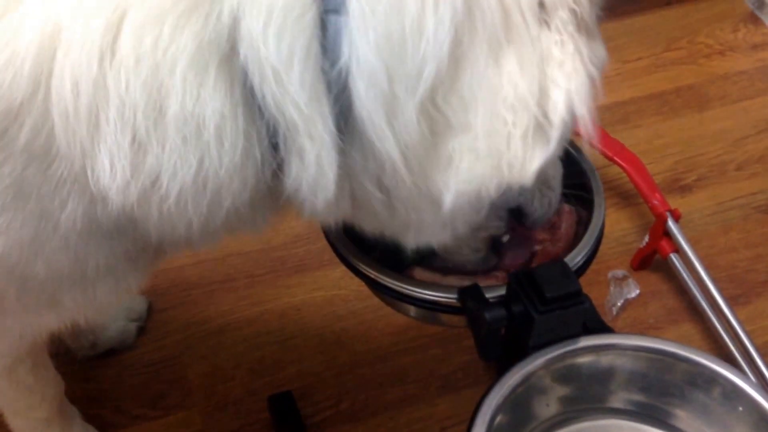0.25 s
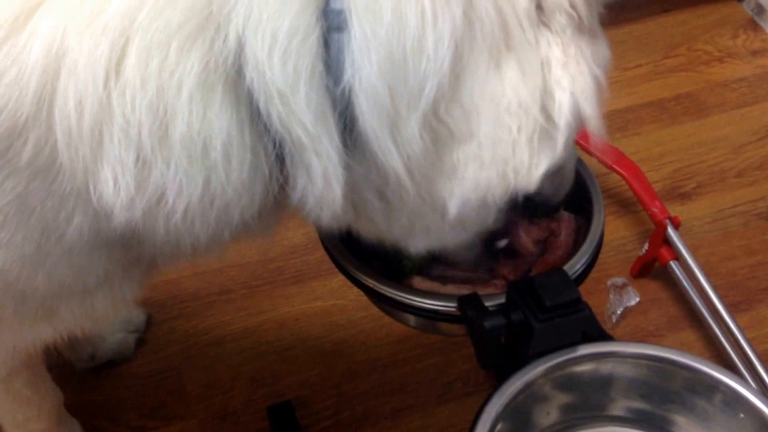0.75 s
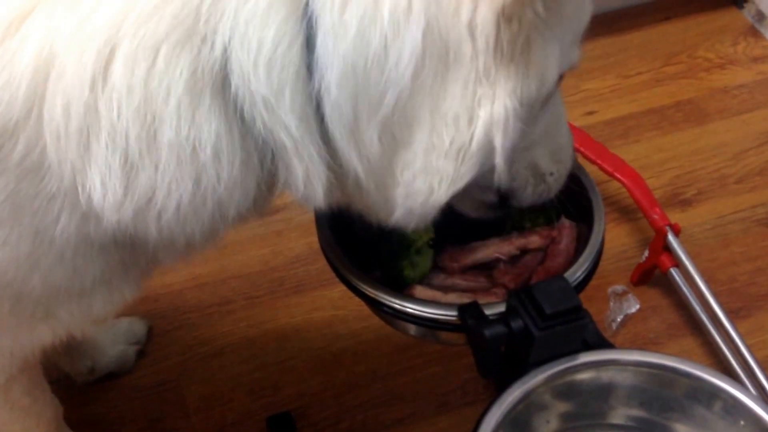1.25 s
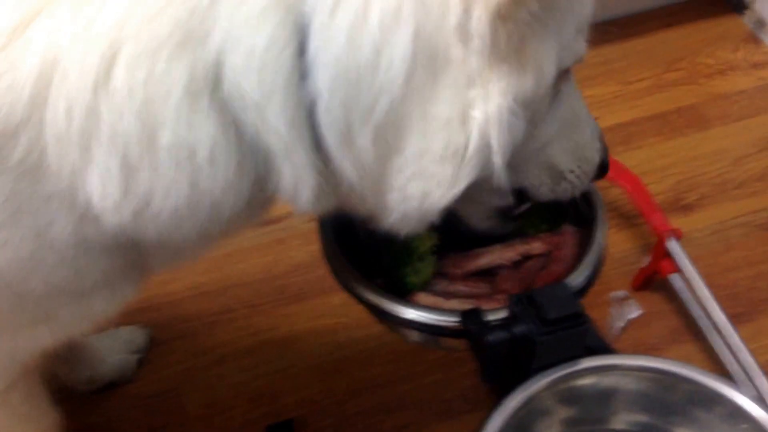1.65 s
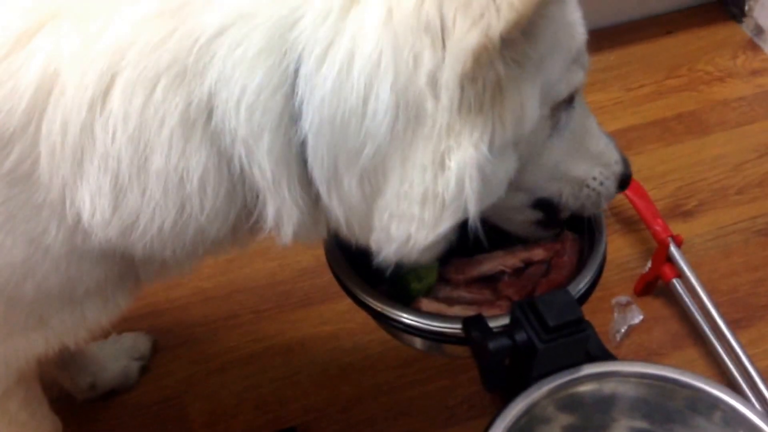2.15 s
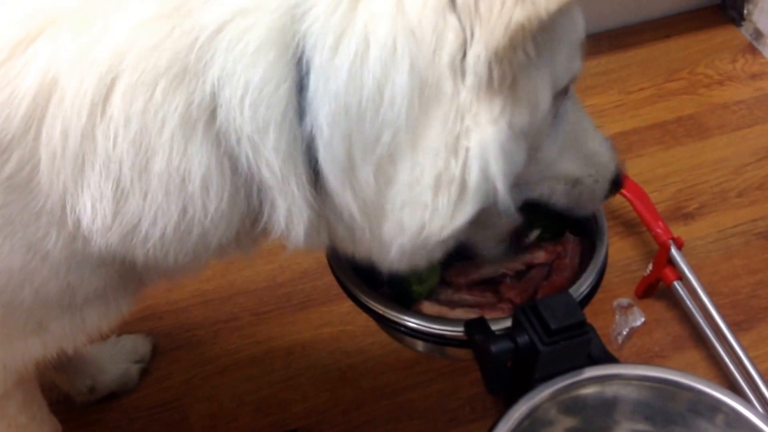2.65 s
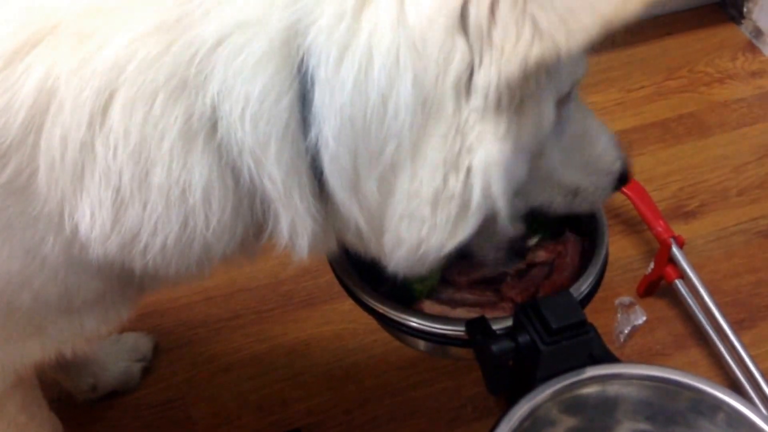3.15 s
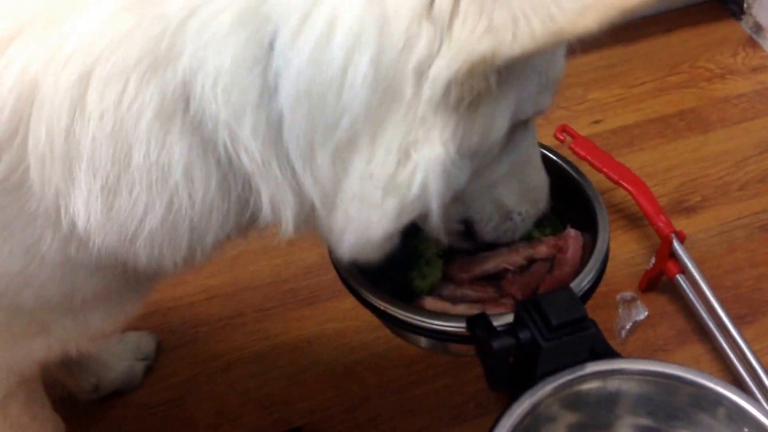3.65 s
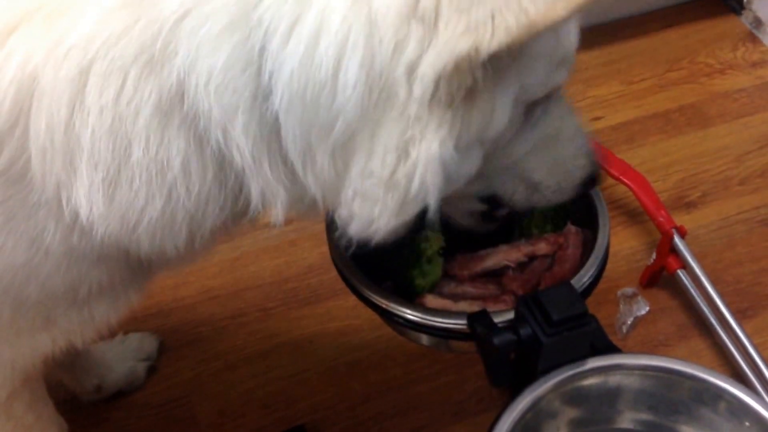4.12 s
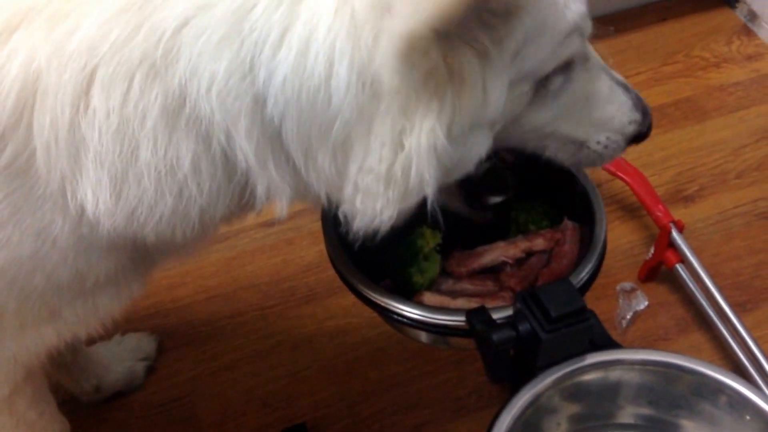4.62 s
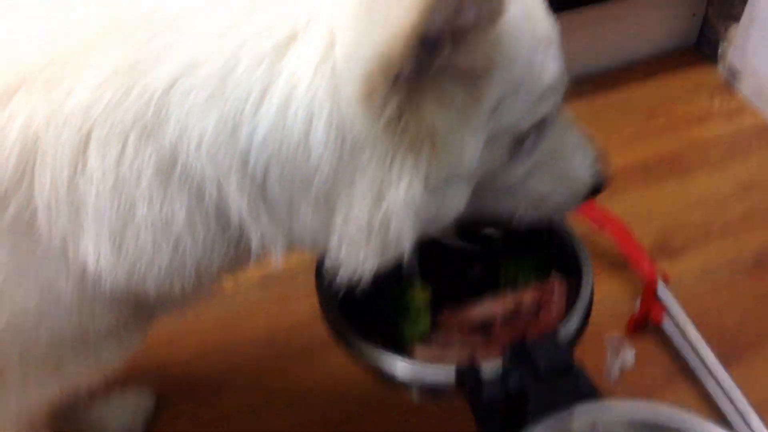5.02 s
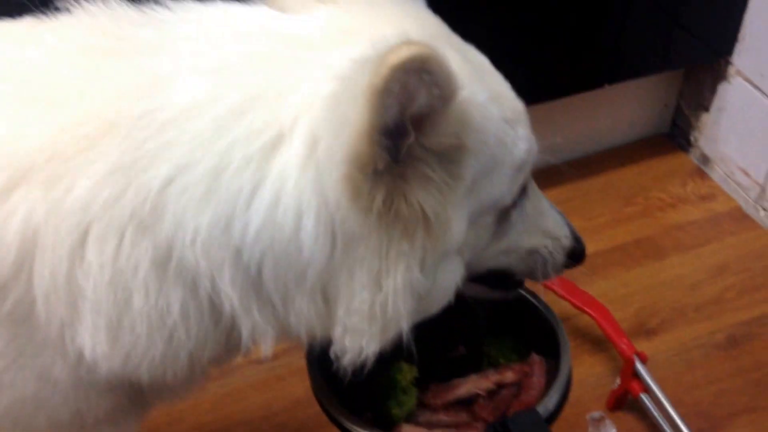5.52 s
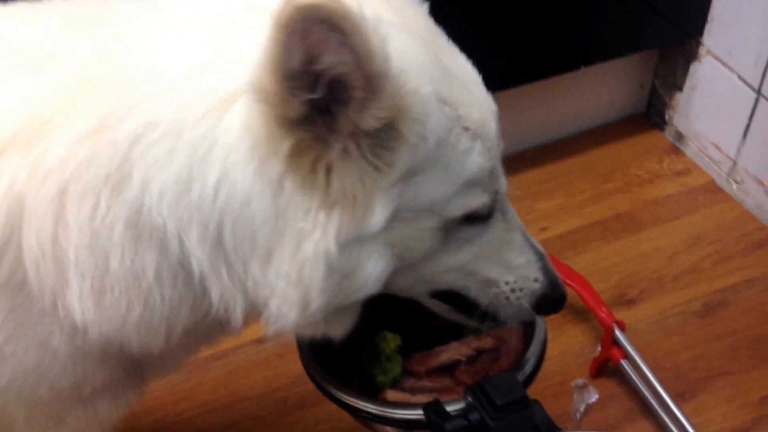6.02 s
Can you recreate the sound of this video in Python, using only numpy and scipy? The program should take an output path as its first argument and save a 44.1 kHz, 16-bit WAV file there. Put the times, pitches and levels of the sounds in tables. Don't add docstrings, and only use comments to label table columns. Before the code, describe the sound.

A dog chews raw food over a steel bowl, close to a small camera microphone in a short, bright kitchen with a faint flutter echo and steady soft hiss. From 0 to 1.8 s it is sparse: wet snaps, dull muffled clacks and hollow mouth pops around 0.4, 0.8 and 1.2. At about 2.1 a sharp clink and sudden crunch, with a low knock in the boards. A pause with small wet snaps, then at 2.9-3.1 a rapid cluster of clinks, pops, bright fizzing snaps and grinding. From 3.3 to 4.4 only faint mumbling tongue pops, light ticks and low grinding. At 4.45 the loudest bite: a deep hollow pop, hard crack and dull clack, followed by floor knocks until 4.9. Quiet mouthing follows, then busy clinks and crunching at 5.5-5.7, and a last burst at 6.05-6.15 with steady grinding to the end at about 6.3.

```python
import sys
import numpy as np
from scipy import signal
from scipy.fft import rfft, irfft
from scipy.io import wavfile
from scipy.ndimage import uniform_filter1d

SR = 44100
rng = np.random.default_rng(int(sys.argv[2]) if len(sys.argv) > 2 else 0)


def gain_from_db(level_db):
    decades = np.asarray(level_db, float) / 20
    return 10 ** decades


def output_pcm(signal):
    pcm = np.clip(np.atleast_2d(signal).T, -1, 1) * 32767
    wavfile.write(sys.argv[1], SR, np.round(pcm).astype(np.int16))


N = 276948

# frequency_hz, density_db
HISS_SPECTRUM = [(24, -40), (38, 6.5), (61, -3), (182, 4.5), (430, -2.5), (717, -5.5), (889, -5),
                 (1330, -12), (1740, -8), (2100, -8), (4330, -6.5), (14100, -10.5), (15300, -11)]
# start_s, peak_db, pitch_hz
THUMPS = [(0.129, -56, 69.6), (0.168, -61.5, 74), (0.889, -61, 62), (3.377, -67, 98), (4.654, -51.5, 72),
          (4.697, -52, 68), (4.789, -55, 67.32), (4.892, -59.5, 71.5), (5.876, -58, 71), (6.079, -54, 38),
          (6.137, -57, 67), (6.218, -63, 63.4)]
# start_s, peak_db, pitch_hz
KNOCKS = [(0.13, -59, 167), (0.243, -53.5, 318), (0.266, -62, 184), (1.829, -61, 340), (2.096, -50.5, 219),
          (2.163, -47.5, 177.5), (2.92, -54.5, 208), (2.948, -49, 337), (3.004, -50.5, 223),
          (3.368, -59.5, 158), (4.45, -42.5, 163), (4.657, -45.5, 342), (4.673, -42, 228.6),
          (4.719, -43.5, 209), (4.802, -54, 234.4), (4.858, -56.5, 229.4), (5.55, -62, 230),
          (5.62, -55, 194.6), (6.041, -58, 224), (6.118, -63, 157), (6.165, -51.5, 216),
          (6.224, -54.5, 241)]
BOARD_MODES = [130.5, 172.3, 218.3, 274.4, 340, 398.7]
# start_s, level_db
GRIND_SPELLS = [
    [(1.88, -94), (2.112, -40.5), (2.3, -58)],
    [(2.7, -58.5), (2.972, -47.5), (3.2, -88)],
    [(3.3, -64), (3.722, -59.5), (4.44, -56)],
    [(4.46, -33.5), (4.616, -54.5), (4.9, -58)],
    [(5.3, -63.5), (5.634, -42.5), (5.8, -73)],
    [(5.93, -52.5), (6.06, -52), (6.28, -48.5)],
]
# frequency_hz, density_db
CRUNCH_SPECTRUM = [(180, -46), (300, -17), (681, -7), (925, 2.5), (1300, -3.5), (1760, 0), (2170, -0.5),
                   (4260, -5), (14000, -18)]
# start_s, peak_db, centre_hz
SNAPS = [(0.163, -39, 5270), (0.451, -44, 6500), (0.706, -45, 5700), (0.998, -48, 8080), (1.899, -47, 6330),
         (2.0988, -38, 6460), (2.211, -36, 4870), (2.455, -36.5, 5400), (2.9446, -45, 6200),
         (2.9536, -28, 6100), (3.011, -36, 5900), (3.1054, -31, 5200), (3.3368, -46, 6946),
         (3.5492, -43.5, 5650), (4.409, -45.5, 5560), (4.447, -32, 4000), (4.45, -22.5, 5000),
         (5.1, -41, 6500), (5.5483, -39, 5910), (5.606, -54, 4900), (5.7037, -36.5, 5430),
         (5.9434, -52, 5120), (6.0484, -35, 6200), (6.093, -48, 5050), (6.1273, -34, 5100)]
# start_s, peak_db, centre_hz
FIZZES = [(0.4503, -38.5, 12900), (0.8629, -46, 11300), (1.8397, -36.5, 12900), (2.169, -37, 8600),
          (2.7934, -38.5, 10600), (2.9163, -41, 9300), (2.9412, -26, 9300), (3.1047, -24, 14100),
          (3.109, -49, 10700), (5.2654, -43, 8100), (5.348, -43, 9400), (5.6565, -39, 9500),
          (6.0492, -43, 12000), (6.1265, -39.5, 9100)]
# pitch_hz, width_hz, level_db
BOWL_MODES = [(1766, 8.1, -2), (2320, 13, -10), (2710, 46, -10), (3260, 27, -3), (4160, 160, -8.5),
              (5714, 130, -14), (7260, 100, -16.5), (4830, 84, -26), (7940, 46, -39), (8360, 35, -33)]
# start_s, peak_db, lower_ring_hz, upper_ring_hz
CLINKS = [(0.161, -42.5, 1480, 2940), (1.8995, -45.5, 2150, 3160), (1.9284, -39, 1800, 2630),
          (2.0997, -27.5, 1860, 3870), (2.172, -40.5, 1880, 2550), (2.455, -44, 1870, 4300),
          (2.9173, -33, 1880, 2570), (2.9447, -36.5, 1480, 3400), (2.9511, -25.5, 1840, 2960),
          (2.979, -60, 1670, 3170), (3.9265, -46, 1980, 2380), (4.298, -50.5, 1920, 3260),
          (4.6862, -56, 1420, 2854), (4.696, -53, 1570, 4240), (4.8158, -55, 1800, 2540),
          (5.016, -52.5, 1320, 2980), (5.1863, -54.5, 1720, 2570), (5.2082, -51.5, 2040, 5860),
          (5.4373, -45.5, 2160, 3460), (5.4943, -53.5, 1840, 2710), (5.5476, -40, 1780, 2460),
          (5.562, -36, 1760, 4040), (5.6241, -35.5, 1940, 4200), (5.6644, -45.5, 1340, 2450),
          (5.701, -51, 1530, 3130), (5.7174, -41, 1680, 4160), (5.8707, -57.5, 2170, 4470),
          (6.0468, -33.5, 1520, 3870), (6.2244, -49, 1440, 3300)]
# start_s, peak_db, ring_hz, contact_ms
CLACKS = [(0.187, -54, 1290, 70), (0.4515, -55.5, 2120, 4.9), (0.705, -54, 2130, 10),
          (1.1706, -54.5, 2040, 7.4), (1.341, -62.5, 1760, 12), (1.363, -53.5, 2030, 12),
          (1.416, -58, 1900, 10), (2.485, -50, 1730, 4.08), (2.7525, -52.5, 1340, 16.1),
          (2.967, -31, 1880, 5), (3.0114, -35, 1800, 6.4), (3.032, -41, 1690, 8.7),
          (3.5862, -58.5, 1560, 16.2), (3.8974, -52, 1730, 7), (4.0974, -60.5, 1700, 23),
          (4.453, -26.5, 1920, 14.4), (4.537, -34.5, 1800, 4.4), (4.788, -56, 2170, 5.1),
          (4.8312, -56.5, 1800, 8.4), (5.084, -46.5, 1300, 20), (6.13, -35.5, 1550, 14)]
# start_s, peak_db, ring_hz
TICKS = [(0.133, -60, 1890), (0.998, -56, 2840), (1.275, -56, 3720), (2.082, -59, 2950),
         (3.3347, -54, 4520), (3.6737, -46.5, 3610), (3.9303, -45.5, 2360), (4.212, -51, 3320),
         (4.2858, -53, 4260), (5.3483, -56, 3050), (5.3584, -50.5, 3750), (5.393, -50.5, 2620),
         (5.597, -44, 4150), (5.9, -53, 3720), (5.94, -48, 3460), (6.15, -51, 2710), (6.1677, -59, 2630),
         (4.4544, -39, 2750), (4.553, -59, 2700), (2.115, -56, 4200), (6.094, -50, 4000),
         (6.113, -54, 4050)]
# start_s, peak_db, ring_hz, contact_ms
PRICKS = [(2.955, -29, 2050, 1.6), (3.1078, -37.5, 2580, 8.3), (5.6101, -34.5, 3800, 5.6),
          (5.6251, -37.5, 4700, 3), (5.7046, -45, 4970, 3), (2.178, -52, 2600, 3.4), (2.215, -51, 2900, 4),
          (3.034, -40, 2650, 3.8), (2.9445, -37, 3000, 1.6), (5.718, -47, 2470, 1.1),
          (6.1285, -38.5, 4760, 2.5), (4.769, -56, 1900, 6)]
# start_s, peak_db, cavity_hz, length_ms
POPS = [(0.365, -50, 894, 10), (0.374, -41.5, 890, 5.1), (0.78, -38, 853, 6.6), (1.171, -41.5, 930, 4),
        (1.447, -44, 935, 6.9), (1.95, -51.5, 980, 6.3), (2.099, -44, 1245, 11), (2.171, -36, 996, 4),
        (2.9065, -39.5, 945, 4.9), (2.918, -34.5, 1180, 7.3), (2.9525, -28.5, 1170, 3),
        (2.9675, -33, 1090, 3.1), (3.008, -36.5, 1010, 6.3), (3.604, -52, 1090, 7.6),
        (4.382, -48.5, 1080, 5), (4.4535, -18.5, 898, 7.1), (4.857, -45, 915, 1.6),
        (5.016, -49.5, 840, 4.4), (5.086, -55, 1550, 4), (5.55, -54, 1270, 9.8), (5.561, -43.5, 1310, 9.3),
        (5.636, -46.5, 1260, 8.3), (6.045, -46.5, 890, 9.5), (6.13, -42, 1140, 3.7), (6.259, -50, 840, 6.8)]
# start_s, peak_db, cavity_hz
MUMBLES = [(0.707, -58, 880), (1.186, -58.5, 677), (1.25, -63, 645), (1.462, -60.5, 675),
           (1.355, -58.5, 790), (1.844, -61, 660), (2.071, -57, 910), (2.181, -45, 884), (2.486, -62, 985),
           (3.476, -58.5, 930), (3.586, -60, 910), (3.661, -57, 886), (3.782, -59, 830),
           (3.922, -59.5, 873), (4.088, -61, 886), (4.214, -60, 990), (4.348, -56, 1290), (4.806, -62, 890),
           (4.824, -54, 928), (5.151, -62, 1025), (5.286, -60, 858), (5.496, -58.5, 1270),
           (5.822, -58.5, 840), (5.958, -57, 820), (5.999, -56.5, 775), (6.227, -56, 840),
           (4.393, -57, 1340), (4.412, -54, 910), (4.427, -56, 910), (4.441, -54, 880), (4.597, -63, 890),
           (4.64, -60, 847), (5.094, -59, 1215), (2.782, -60, 1280), (5.605, -48, 1600), (6.069, -57, 1490),
           (6.095, -50, 1510), (4.684, -55, 2850), (4.828, -53.5, 1800), (4.868, -60.5, 1250),
           (4.9, -60, 1010), (4.92, -62, 1170), (4.768, -62, 1800), (2.083, -56, 930), (4.991, -59, 920)]
# frequency_hz, t60_s
KITCHEN_DECAY = [(300, 0.93), (900, 0.24), (2000, 0.34), (5000, 0.29), (10000, 0.25), (15000, 0.083)]

HISS_DB = -64
THUMP_T60_S, KNOCK_T60_S = 0.2, 0.22
SNAP_OCTAVES, SNAP_MS = 0.49, 10
FIZZ_OCTAVES, FIZZ_MS = 0.77, 13.5
STRIKE = 8.4
CLINK_UPPER_DB, CLINK_MS = -3.5, 13.6
CLACK_UPPER_DB, CLACK_RATIO = -32, 1.6
TICK_UPPER_DB, TICK_LOW_HZ, TICK_MS = 4.5, 1800, 15
MUMBLE_MS = 11.7
HALL_DB, HALL_T60_S = -14.5, 0.7
FLUTTER_S, SCATTER_S, FLUTTER_DB, BOUNCE_DB = 0.0245, 0.0015, -22.5, -4.0
EDGE_HZ, LOW_CUT_HZ = 15360, 36


def evened(x):
    return x / np.sqrt(np.mean(x ** 2) + 1e-20)


def read(points, hz):
    f, value = np.transpose(points)
    return np.interp(np.log(hz + 1), np.log(f + 1), value)


def follow(tables):
    t = np.arange(N) / SR
    gain = np.zeros(N)
    for rows in map(np.array, tables):
        gain += gain_from_db(np.interp(t, rows[:, 0], rows[:, 1], -150, -150))
    return uniform_filter1d(gain, 200)


def add(mix, s, db, sound):
    part = mix[..., round(s * SR):][..., :sound.shape[-1]]
    peak = abs(np.atleast_2d(sound)[0]).max()
    part += gain_from_db(db) * sound[..., :part.shape[-1]] / peak


def resonate(x, hz, width):
    r = np.exp(-np.pi * width / SR)
    poles = [2, -4 * r * np.cos(2 * np.pi * hz / SR), 2 * r * r]
    return signal.lfilter([1 - r * r, 0, r * r - 1], poles, x)


def contact(ms, rise):
    u = np.arange(2048) / SR / (ms / 1000)
    release = np.exp(-0.8 * u - u ** 3) + 0.15 * np.exp(-u)
    return (1 - np.exp(-u / rise)) ** 2 * release


def hiss():
    frames, hz = N // 256 + 5, np.fft.rfftfreq(1024, 1 / SR)
    a, b, patches = rng.standard_normal((frames, 513, 3)).T
    patches = evened(uniform_filter1d(uniform_filter1d(patches, 5, 0), 10, 1))
    lumps_db = 0.9 + 2.2 / (1 + (hz / 1200) ** 2)
    level_db = read(HISS_SPECTRUM, hz)[:, None] + lumps_db[:, None] * patches
    noise = signal.istft((a + 1j * b) * gain_from_db(level_db), nperseg=1024, noverlap=768)[1][:N]
    return gain_from_db(HISS_DB + 1.5) * evened(noise)


def boards():
    out, t = np.zeros(N), np.arange(SR // 2) / SR
    rows = [(*row, THUMP_T60_S, 0) for row in THUMPS]
    rows += [(*row, KNOCK_T60_S, 0.47) for row in KNOCKS]
    for (s, db, hz, t60, neighbours), chance in zip(rows, rng.random((len(rows), 13))):
        tone = np.sin(2 * np.pi * (hz * t + chance[0]))
        for f, phase, luck in zip(BOARD_MODES, chance[1:7], chance[7:]):
            mode_hz = f * (0.85 + 0.182 * luck)
            mode = np.sin(2 * np.pi * (mode_hz * t + phase))
            tone += neighbours * gain_from_db(-0.12 * f * t) * mode
        push = (1 - np.exp(-t * hz)) ** 2
        add(out, s - 0.004, db, tone * push * gain_from_db(-60 * t / t60))
    return out


def grind():
    out, hz = np.zeros(N), np.fft.rfftfreq(N, 1 / SR)
    for f in np.geomspace(700, 9000, num=12):
        size = gain_from_db(3.0 * np.minimum(rng.exponential(1, N), 4)) * rng.choice([-1, 1], N)
        cracks = size * (rng.random(N) < 160 / SR)
        out += evened(resonate(cracks, f, 0.18 * f)) * np.sqrt(f)
    coloured = irfft(rfft(out) * gain_from_db(read(CRUNCH_SPECTRUM, hz)), N)
    return follow(GRIND_SPELLS) * gain_from_db(-14) * evened(coloured)


def snaps():
    out, hz = np.zeros(N), np.fft.rfftfreq(2048, 1 / SR) + 1
    rows = [(*row, SNAP_OCTAVES, SNAP_MS) for row in SNAPS]
    rows += [(*row, FIZZ_OCTAVES, FIZZ_MS) for row in FIZZES]
    for (s, db, centre_hz, octaves, ms), g in zip(rows, rng.standard_normal((len(rows), 2048))):
        colour = gain_from_db(-6 * (np.log2(hz / centre_hz) / octaves) ** 2)
        crackle = irfft(rfft(g * abs(g)) * colour)
        add(out, s - 0.001, db - 4.5, crackle * contact(ms, 0.15))
    return out


def clinks():
    out = np.zeros((4, N))
    hits = [(*row, CLINK_UPPER_DB, CLINK_MS) for row in CLINKS]
    hits += [(s, db, hz, CLACK_RATIO * hz, CLACK_UPPER_DB, ms) for s, db, hz, ms in CLACKS]
    hits += [(s, db, TICK_LOW_HZ, hz, TICK_UPPER_DB, TICK_MS) for s, db, hz in TICKS]
    hits += [(s, db, TICK_LOW_HZ, hz, TICK_UPPER_DB, ms) for s, db, hz, ms in PRICKS]
    grit = rng.standard_normal((len(hits), 3, 2048))
    luck = rng.standard_normal((len(hits), len(BOWL_MODES)))
    for (s, db, low_hz, high_hz, high_db, ms), g, chance in zip(hits, grit, luck):
        force = g * np.sqrt(abs(g)) * contact(ms, 0.06)
        force[:, 30] += STRIKE
        upper = min(gain_from_db(2 * high_db), 0.97)
        low = evened(resonate(resonate(force, low_hz, 200), low_hz, 1950)) * np.sqrt(1 - upper)
        high = evened(resonate(resonate(force, high_hz, 330), high_hz, 1015)) * np.sqrt(upper)
        centre_hz = low_hz * (high_hz / low_hz) ** upper
        near = np.zeros_like(force)
        for (f, width, level_db), c in zip(BOWL_MODES, chance):
            mode_db = level_db + 2.0 * c - 1.2 * np.log2(f / centre_hz) ** 2
            near += gain_from_db(mode_db) * resonate(force, f, width + 170)
        crack = resonate(force, centre_hz, 0.82 * centre_hz)
        crack = evened(resonate(crack, centre_hz, 0.7 * centre_hz))
        thud = evened(resonate(force, 674, 200))
        rest = 0.5 * evened(near) + 0.13 * thud
        direct = (low + high + rest + 0.5 * crack)[0]
        walls = 0.9 * low + 0.98 * high + rest + 0.74 * crack
        add(out, s - 0.001, db + 2.5, np.vstack([direct, walls]))
    return out


def pops():
    out, t = np.zeros((2, N)), np.arange(2048) / SR
    rows = [*POPS] + [(*row, MUMBLE_MS) for row in MUMBLES]
    for (s, db, hz, ms), chance in zip(rows, rng.random((len(rows), 6))):
        turns = hz * t * (1.02 - 2.9 * t)
        u = t * 1000 / ms
        phase = 2 * np.pi * (turns + chance[0])
        tone = np.sin(phase) + 0.087 * np.sin(2 * phase)
        blur = (0.15 + 0.2 * chance[1]) * np.sin(2 * np.pi * (0.92 * turns + chance[2]))
        blur += (0.39 + 0.24 * chance[3]) * np.sin(2 * np.pi * (1.3 * turns + chance[4]))
        swell = (1 - np.exp(-u / 0.17)) ** 2 * np.exp(-1.2 * u ** 2)
        add(out, s - 0.002, db, (tone + np.outer([0.15, 1], blur)) * swell)
    return out


def kitchen(mouth, metal, rest):
    size, out = SR // 2, np.zeros(N)
    t, late = np.arange(N) / SR, np.arange(size) / SR
    for k in range(3):
        taps = np.zeros(size)
        at = np.arange(200, size - 20, 20) + rng.integers(0, 20, (size - 201) // 20)
        g = rng.standard_normal(len(at))
        taps[at] = g * abs(g)
        taps *= 1 - np.exp(-(late / 0.012) ** 2) + 0.5 * np.exp(-((late - 0.024) / 0.004) ** 2)
        hz, frames, z = signal.stft(taps, SR, nperseg=256)
        hz = hz[:, None]
        decay = gain_from_db(-60 * frames / read(KITCHEN_DECAY, hz))
        decay = decay + gain_from_db(HALL_DB - hz / 500 - 60 * frames / HALL_T60_S)
        tail = signal.istft(z * decay, SR, nperseg=256)[1]
        share = np.sqrt(2 / 3) * np.cos(2 * np.pi * (t / 0.7 + k / 3))
        sent = (mouth + rest) * share + metal[k] / np.sqrt(3)
        out += signal.fftconvolve(sent, tail / np.linalg.norm(tail))[:N]
    return out


def flutter(x):
    taps = np.zeros(SR // 4)
    for k, (spot, sign) in enumerate(rng.random((6, 2, 4))):
        at = ((k + 1) * (FLUTTER_S + SCATTER_S * (spot - 0.5)) * SR).astype(int)
        taps[at] = np.sign(sign - 0.5) * gain_from_db(FLUTTER_DB + k * BOUNCE_DB)
    return signal.oaconvolve(x, taps)[:N]


def scene():
    mouth, metal, crackle = pops(), clinks(), snaps() + grind()
    floor = boards() + hiss()
    direct = mouth[0] + metal[0] + crackle
    room = kitchen(gain_from_db(-10.0) * mouth[1], gain_from_db(-8.5) * metal[1:], gain_from_db(-5.0) * crackle)
    room += flutter(direct)
    return (direct + room + floor)[None]


def band_limit(x):
    return signal.sosfilt(signal.butter(12, 16120, fs=SR, output="sos"), x)


def record(dry):
    lowpass = signal.firwin(511, EDGE_HZ, window=("kaiser", 5), fs=SR)
    x = signal.oaconvolve(dry, lowpass[None], "same")
    x = signal.lfilter(*signal.butter(2, LOW_CUT_HZ, "high", fs=SR), x)
    return band_limit(x)


dry = scene()
out = record(dry)
output_pcm(out)
```